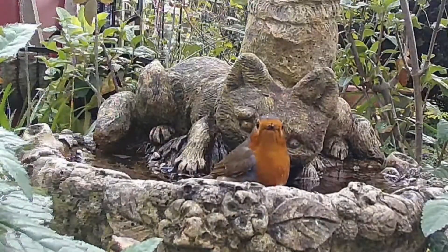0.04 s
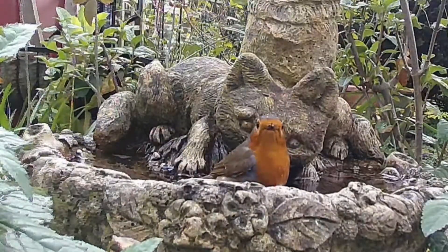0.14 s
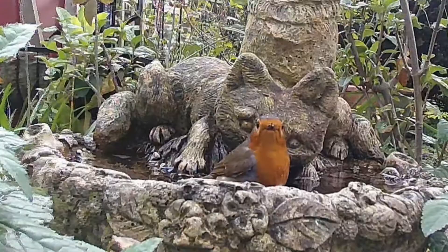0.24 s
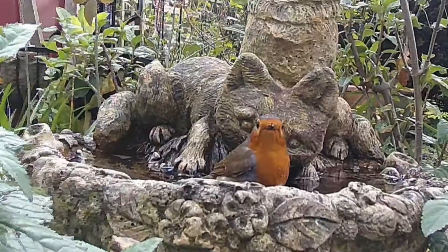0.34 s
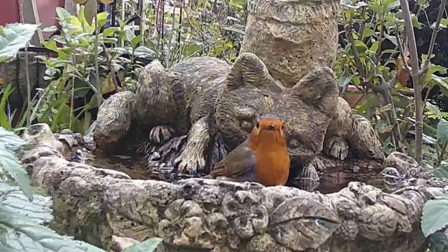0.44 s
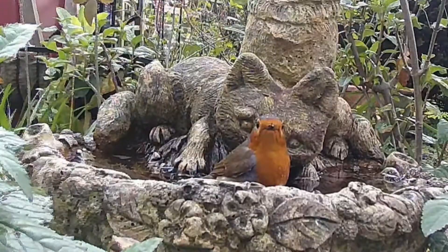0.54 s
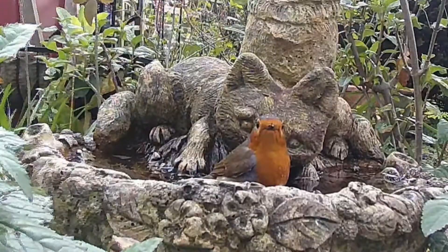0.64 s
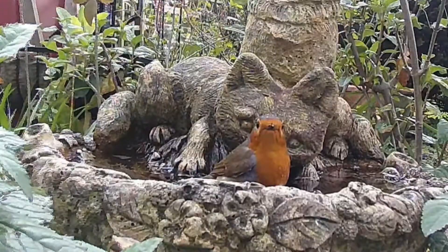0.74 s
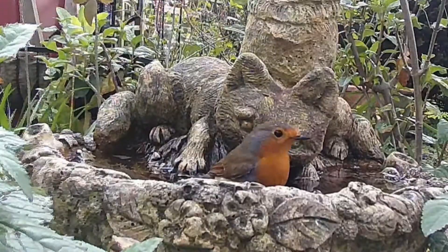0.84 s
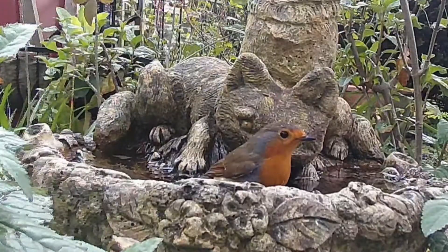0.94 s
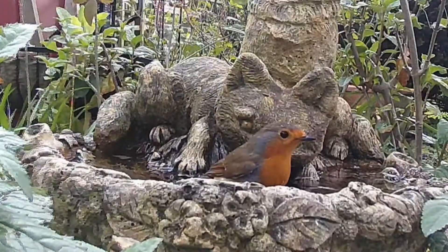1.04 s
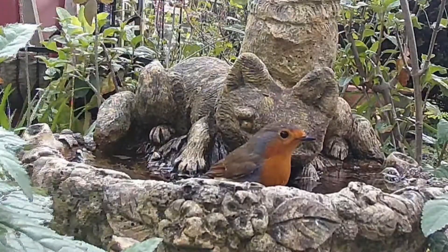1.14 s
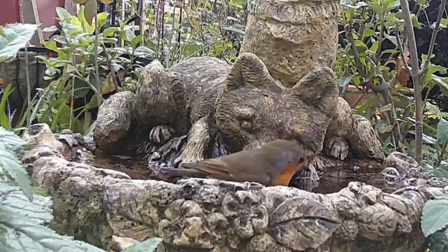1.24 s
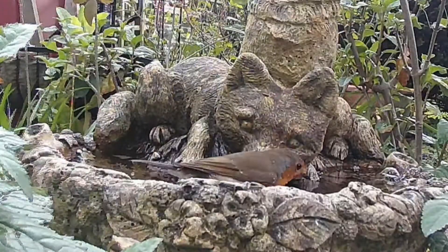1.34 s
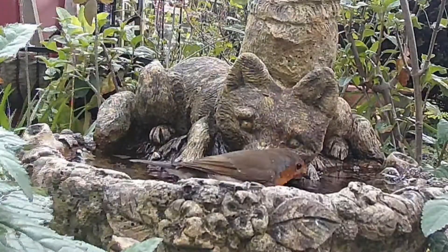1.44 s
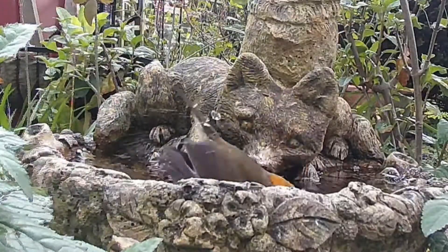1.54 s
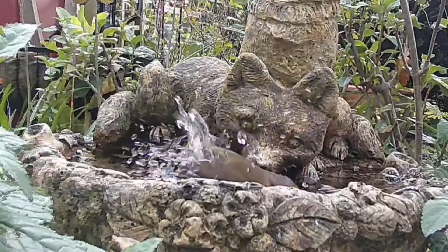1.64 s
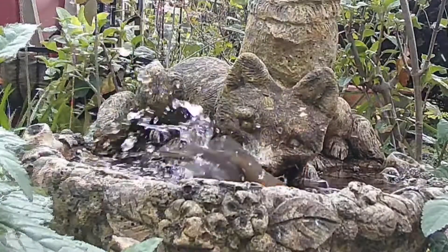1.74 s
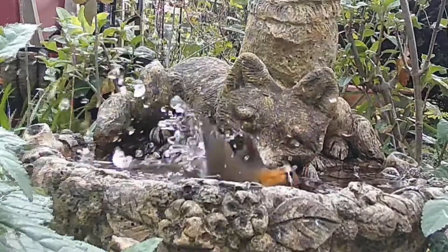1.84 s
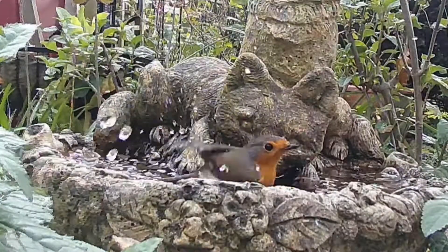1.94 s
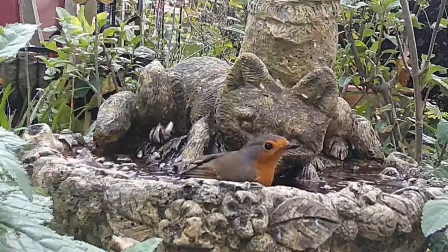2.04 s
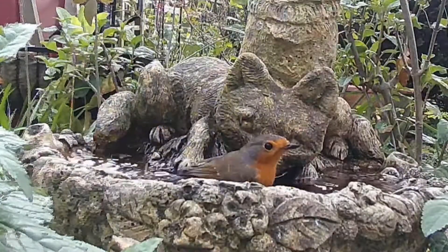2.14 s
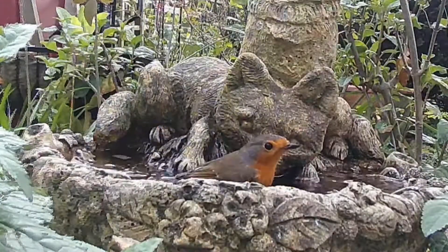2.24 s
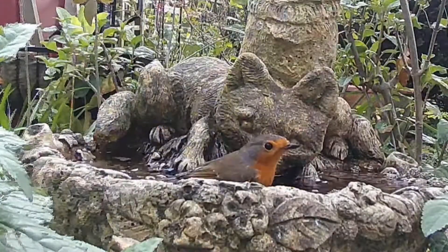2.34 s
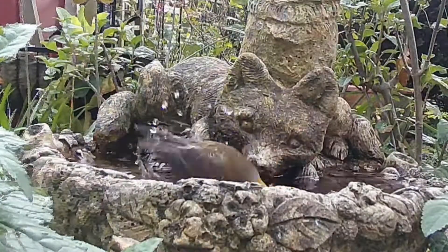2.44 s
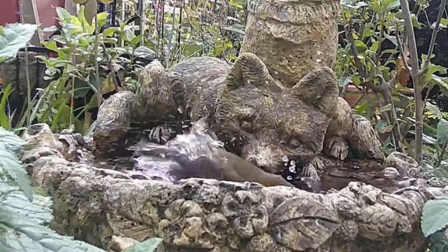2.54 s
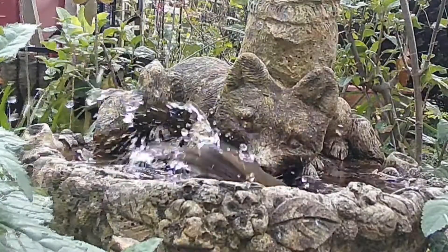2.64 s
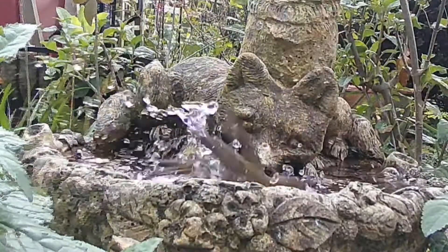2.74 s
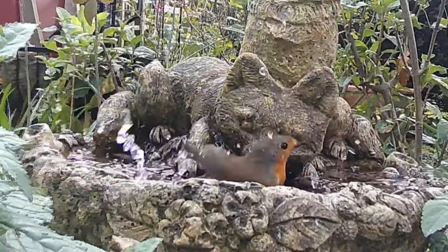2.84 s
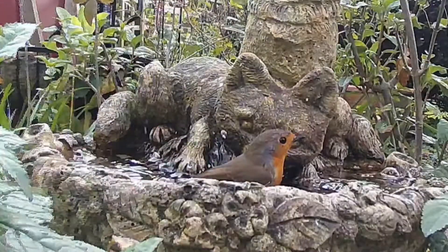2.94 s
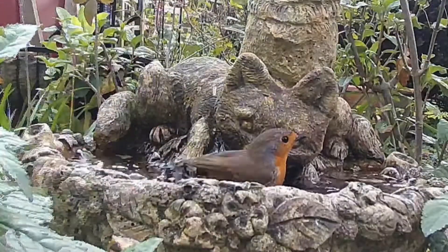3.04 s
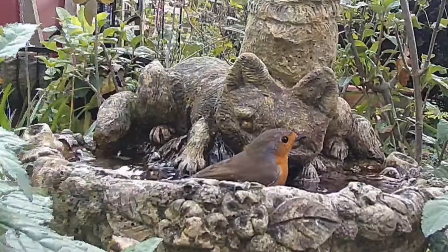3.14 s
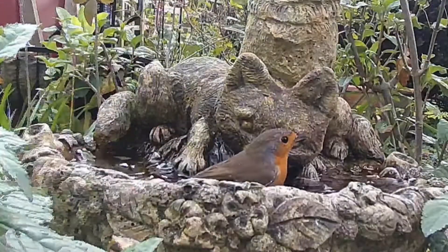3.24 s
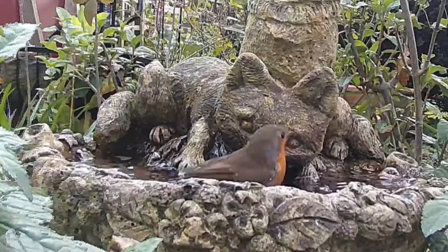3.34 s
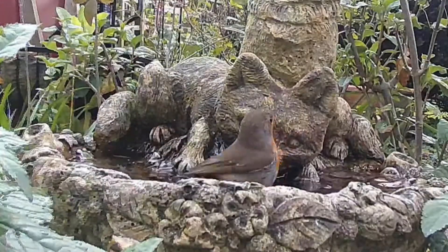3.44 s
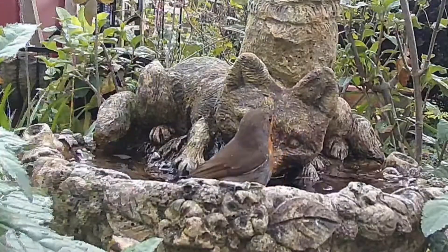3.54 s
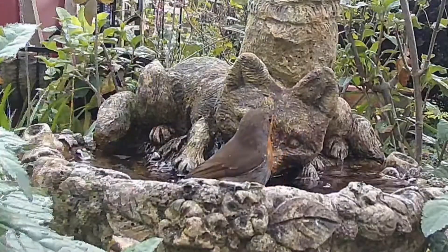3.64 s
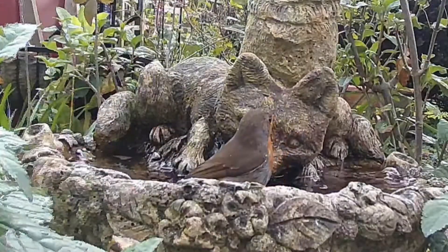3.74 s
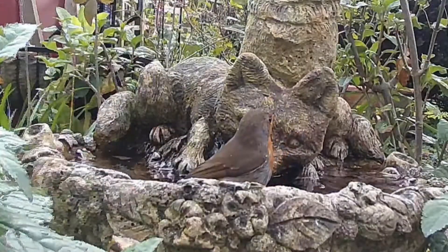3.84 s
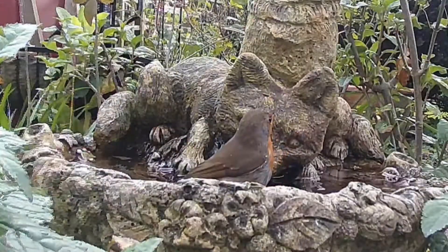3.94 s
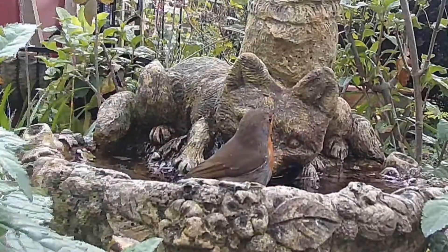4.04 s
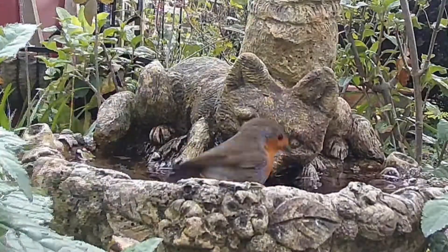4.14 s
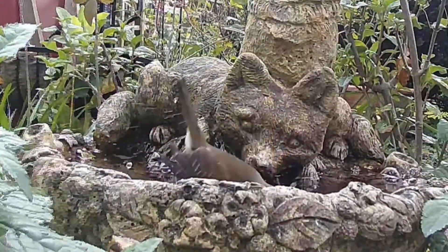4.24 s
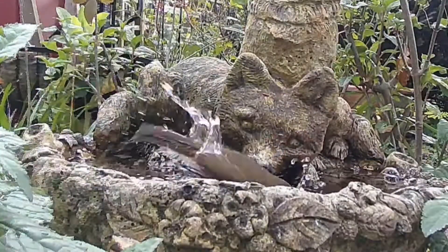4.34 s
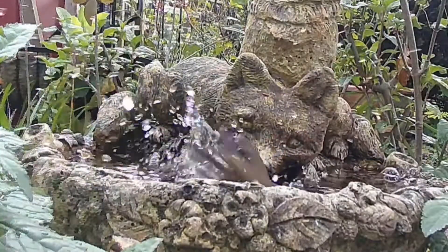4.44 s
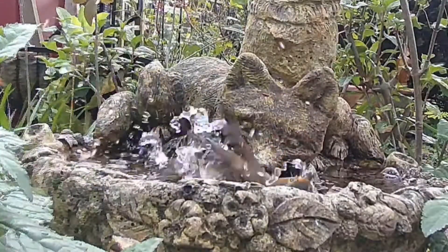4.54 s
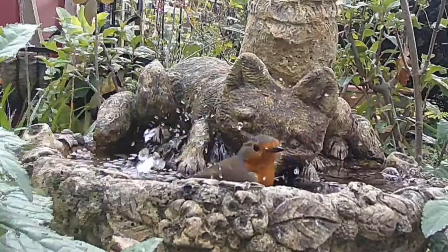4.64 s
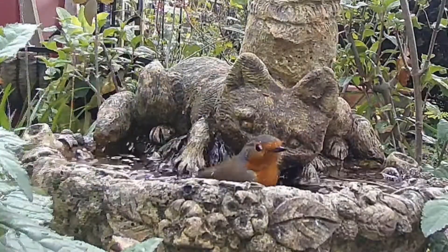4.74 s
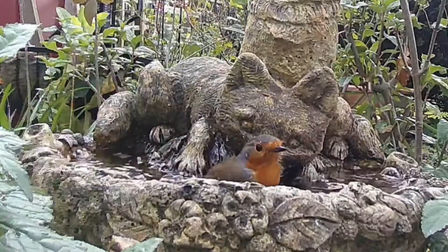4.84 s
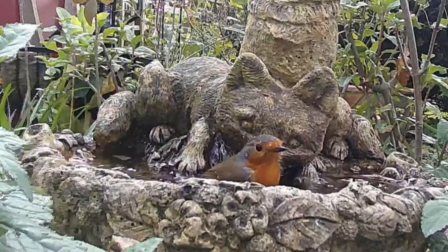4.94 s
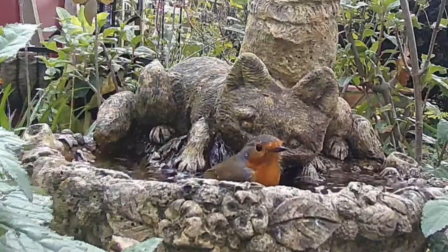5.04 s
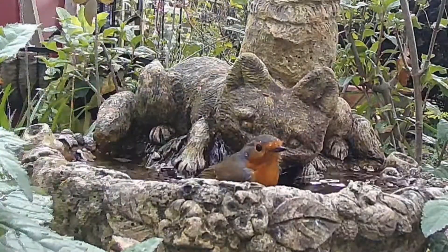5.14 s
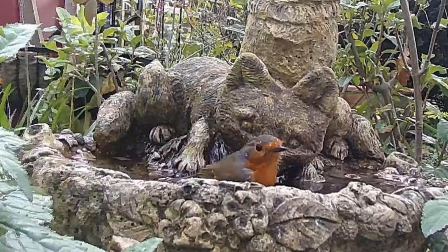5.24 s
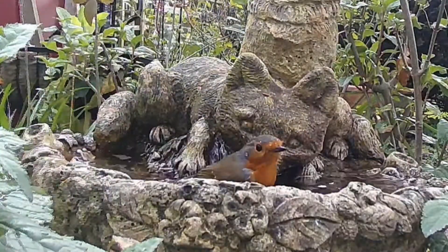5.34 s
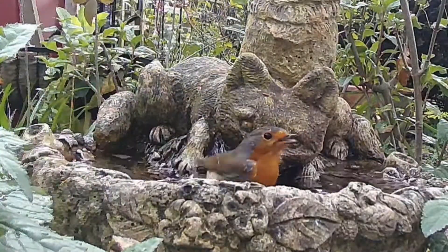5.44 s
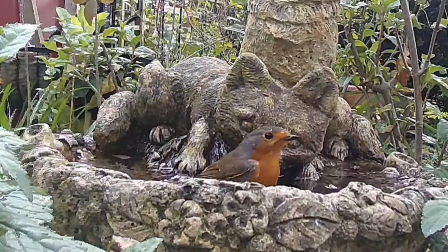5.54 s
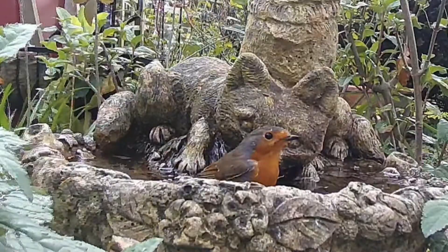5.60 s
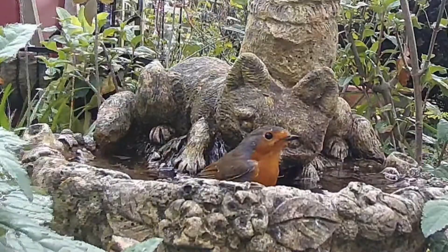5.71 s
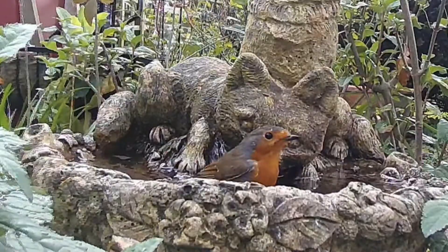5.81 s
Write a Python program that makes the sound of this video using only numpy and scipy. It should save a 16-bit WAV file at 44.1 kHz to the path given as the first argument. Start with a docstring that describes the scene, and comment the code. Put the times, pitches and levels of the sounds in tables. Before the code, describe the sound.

A garden is heard through a slightly muffled microphone, with a steady low rumble of distant road and breeze and a soft hiss. Faint birds chirp and whistle on and off throughout. One dry click sounds at about 0.3 seconds. A far engine hums, rising slowly in pitch, then easing off between 2.5 and 3 seconds. Close up, a small bird bathes in a basin: quick wing slaps on water, fine spray and small plinking drops, from 1.6 to 2 seconds and again from 2.5 to 3. In the pause, a faint traffic drone climbs and a few sharper chirps come at around 3.5 seconds. A third bout of splashing runs from 4.3 to 4.9 seconds. Low gusts of wind buffet the microphone from about 4.2 seconds to the end, near 6 seconds, with thin distant birdsong behind them.

```python
"""Robin in a garden bird bath

Close to the microphone a robin bathes in a stone basin: three bouts of wing slaps, spray and drops
that plink as trapped bubbles ring. Other birds chirp across the garden, a far engine pulls away,
and wind buffets the microphone towards the end. The camera's housing rings near 3 kHz and muffles
everything above; one dry click sounds early on."""
import sys
import numpy as np
from scipy import signal
from scipy.fft import rfft, irfft, next_fast_len
from scipy.io import wavfile
from scipy.ndimage import uniform_filter1d, map_coordinates

SR = 44100
rng = np.random.default_rng(int(sys.argv[2]) if len(sys.argv) > 2 else 0)


def store_wav(level_fs):
    """Save 16-bit WAV to argv[1]."""
    pcm = np.round(np.clip(np.atleast_2d(level_fs), -1, 1) * 32767)
    wavfile.write(sys.argv[1], SR, pcm.T.astype(np.int16))


N = 258867

# Close up, wings and thrown water hit the surface: start_s, relative_db, treble_lift_db
WING_SLAPS = [(1.671, -38.5, -1), (1.678, -32, -3), (1.6884, -35, -2), (1.7562, -38.5, -4),
              (1.77, -35.5, -6), (1.8506, -32, -7), (1.9177, -38, 2), (2.5096, -38, -6), (2.586, -39, -4),
              (2.5997, -38, -2), (2.6816, -31, 0), (2.723, -41, 11), (2.8114, -38, 5), (2.932, -43, 6),
              (2.966, -41.5, 6), (4.367, -37, -1), (4.4654, -40, -5), (4.5504, -38, -3), (4.602, -33.5, -3),
              (4.6056, -35, -2), (4.6328, -36.5, 5), (4.693, -38.5, -2), (4.7385, -37, -4),
              (4.776, -39.5, 5), (4.8434, -41, -1)]
# Bubbles trapped by single drops: start_s, relative_db, pitch_hz, decay_s
DROP_BUBBLES = [(1.678, -41, 2560, 0.005), (1.796, -49, 3050, .005), (1.854, -41, 3040, .004),
                (1.855, -44, 2500, 0.0037), (1.921, -51, 2270, 0.019), (1.977, -43.5, 2030, 0.0078),
                (2.589, -43.5, 2590, .005), (2.613, -45.5, 1590, .005), (2.699, -37.5, 3000, 0.0045),
                (2.7355, -38, 2370, 0.0062), (2.847, -44, 2740, 0.0033), (2.871, -41.5, 3064, 0.0037),
                (4.328, -39, 2780, 0.0033), (4.405, -38.5, 2405, 0.0087), (4.408, -44.5, 2940, 0.0049),
                (4.469, -42.5, 1810, 0.0044), (4.5108, -39, 2150, 0.0038), (4.514, -39.5, 2400, 0.0083),
                (4.5514, -38, 1690, .004), (4.633, -43, 3330, 0.0044), (4.656, -47.5, 4150, .007),
                (4.737, -44.5, 3020, 0.003), (4.739, -44, 1200, 0.013), (4.775, -47, 4000, .003)]
# Bouts of wing shaking: start_s, fullest_s, end_s, spray_db
BATHING_BOUTS = [(1.586, 1.83, 2.023, -59.5), (2.51, 2.587, 2.97, -61.5), (4.31, 4.624, 4.88, -58.5)]
# Spectrum of splashing water: frequency_hz, gain_db
SPLASH_SPECTRUM = [(300, -20.5), (800, -13), (1500, 1.5), (2600, 9), (3400, 4), (5000, -7), (8000, -16.5),
                   (15000, -20)]

# A bird in the hedge repeats one quick rising chip: start_s, level_db
HEDGE_CHIPS = [(.871, -57.5), (3.376, -56), (3.431, -54.5), (3.593, -59.5), (5.116, -61)]
# Raspy falling notes across the garden: start_s, length_s, start_hz, level_db
RASPY_NOTES = [(0.112, .05, 3520, -67), (1.08, .05, 3600, -70), (1.196, 0.073, 3600, -64),
               (3.505, .038, 3550, -59), (3.606, 0.0277, 3000, -56.5), (5.285, 0.033, 4210, -62.5)]
# Thin drawn-out whistles: start_s, length_s, start_hz, end_hz, level_db
THIN_WHISTLES = [(.272, .065, 5100, 5450, -64), (.332, 0.056, 5680, 5720, -62),
                 (0.453, 0.1, 3300, 3330, -68), (0.671, .045, 3330, 3500, -63.5),
                 (1.22, 0.18, 3540, 3603, -67), (1.38, .16, 3620, 3706, -71), (1.347, .05, 2560, 2414, -64),
                 (5.127, 0.12, 5860, 5670, -61), (5.494, 0.059, 3620, 4100, -63),
                 (5.679, .14, 3140, 3243, -69)]
# Faint phrases from the farthest birds: start_s, end_s, pitch_hz, level_db
FAR_PHRASES = [(0, .85, 3406, -71), (1.049, 1.25, 3500, -75), (3.201, 3.85, 4340, -71.5),
               (3.998, 4.35, 3430, -74), (5.298, 5.875, 4510, -70.5)]

# Gusts on the microphone: peak_s, half_width_s, relative_db
MIC_GUSTS = [(3.4, 0.33, -47.5), (4.22, 0.17, -36.5), (4.499, 0.047, -32.5), (4.63, 0.096, -32),
             (4.869, 0.084, -34.5), (5.149, 0.14, -33), (5.391, .12, -36.5), (5.74, 0.13, -39)]
# Spectrum of turbulence at the microphone: frequency_hz, gain_db
BUFFET_SPECTRUM = [(5, -11), (14, -2.5), (25, 0.5), (42, -5.5), (60, -10.5), (90, -19), (140, -29.5),
                   (250, -42), (600, -68.5), (2000, -120)]
# A gust's colour against the breeze: frequency_hz, gain_db
GUST_COLOUR = [(35, 0.5), (70, -4), (120, -4), (220, -0.5)]

# A far engine speeds up, then eases off: time_s, firing_hz, load_db
ENGINE_RUN = [(0, 55.1, 0), (.35, 59.96, -1), (1.0, 64.22, -1), (1.4, 67.94, -3), (1.8, 70.43, -4.5),
              (2.15, 75.04, -2.5), (2.55, 75.6, -3), (2.72, 65.2, -1.5), (3.05, 53.2, -5.5)]
# Its orders: firing_multiple, relative_db
ENGINE_ORDERS = [(.5, -57), (1, -44.5), (2, -64)]
# Exhaust resonances that boom as an order pulls through: centre_hz, half_width_hz, lift_db
EXHAUST_BOOMS = [(34.4, 4, 11.5), (128.3, 7.9, 15), (151.76, 1.8, 8)]
# A higher drone climbs in the traffic: time_s, pitch_hz, level_db
TRAFFIC_DRONE = [(2.5, 196, -66.5), (2.92, 213, -60.5), (3.08, 238, -60.5), (3.35, 252.5, -60.5),
                 (3.5, 261, -70), (3.9, 275, -65.5)]
# Spectrum of distant road rumble: frequency_hz, gain_db
ROAD_SPECTRUM = [(20, -5.5), (55, 7.5), (85, 6), (130, 4), (180, 0), (240, -2.5), (330, -12), (600, -33.5),
                 (3000, -82)]
# Spectrum of far tyres and leaves: frequency_hz, gain_db
HISS_SPECTRUM = [(100, -4.5), (350, -2), (550, -1), (780, 0.5), (1100, -2), (1500, -7), (2100, -8.5),
                 (3200, -10), (5000, -14.5), (8000, -11), (15000, -14)]
# The slow drift of their hiss: time_s, relative_db
HISS_LEVELS = [(0.0, -63.5), (2.43, -65), (2.65, -63.5), (3.76, -66), (4.48, -64), (5.87, -64.5)]
# Response of the housing around the microphone: frequency_hz, gain_db
HOUSING_RESPONSE = [(1500, 1), (2100, -1.5), (2600, -2), (3050, 1.5), (3330, 2.5), (3600, -5),
                    (4000, -13.5), (4700, -21), (5800, -19), (7100, -15), (7800, -18), (8700, -35.5),
                    (15000, -41)]


def wing_slaps(gain_db=7.5, snap_db=-4, crack_t60_s=0.018, wash_db=-23, wash_t60_s=0.23):
    """Each slap on the water is a snap, a short crack and a weaker wash of torn water."""
    out, t = np.zeros(N), np.arange(SR // 20) / SR
    for start_s, db, treble_db in WING_SLAPS:
        crack = amp(-60 * t / crack_t60_s)
        wash = amp(wash_db - 60 * t / wash_t60_s)
        burst = rng.standard_normal(len(t)) * (crack + wash)
        burst[0] += amp(snap_db) * np.linalg.norm(burst)
        splash = colour(burst, SPLASH_SPECTRUM)
        splash = colour(splash / np.linalg.norm(splash), [(3000, 0), (4500, treble_db)])
        add(out, start_s, amp(db + gain_db) * splash)
    return out


def drops(gain_db=1, rise_per_s=16):
    """Single drops plink in the basin; each trapped bubble rises in pitch as it surfaces."""
    out = np.zeros(N)
    for start_s, db, hz, decay_s in DROP_BUBBLES:
        add(out, start_s, amp(db + gain_db) * bubble(hz, hz * (1 + rise_per_s * decay_s), decay_s))
    return out


def spray(droplets_per_s=520, centre_hz=2600, spread=0.36, decay_cycles=4, patter_db=-2, mist_db=-9):
    """Shaken feathers throw a patter of tiny droplets over a fine mist."""
    flow = sum(bout(*row) for row in BATHING_BOUTS)
    patter = np.zeros(N)
    for when, smallness, pitch in rng.random((int(droplets_per_s * N / SR), 3)):
        hz = centre_hz * np.exp(2 * spread * (2 * pitch - 1))
        strength = amp(-5 * np.log(smallness + 0.083))  # many small droplets, few large ones
        add(patter, when * N / SR, strength * bubble(hz, hz * 1.12, decay_cycles / hz))
    return flow * (amp(patter_db) * unit(patter) + amp(mist_db) * noise(SPLASH_SPECTRUM))


def bout(start_s, fullest_s, end_s, db, edge_db=-5.5):
    """The flow of spray swells to its fullest and ebbs."""
    shape = [(start_s, edge_db), (fullest_s, 0), (end_s, edge_db)]
    return amp(db + curves(shape)[0]) * during(shape, fade_s=0.04)


def bubble(start_hz, end_hz, decay_s, onset_s=0.0001, fall_db=19):
    """A surfacing bubble rings, sliding to end_hz and dying by fall_db within decay_s."""
    t = np.arange(int(2 * decay_s * SR) + 2) / SR
    age = t / decay_s
    envelope = (1 - np.exp(-t / onset_s)) * amp(-fall_db * age)
    return envelope * sine(start_hz + (end_hz - start_hz) * age)


def songbirds(chip_hz=2910, chip_rise=1.36, chip_s=0.024, rasp_fall=0.85, echo_db=-34):
    """Chips, rasps and whistles across the garden; the fainter a bird, the more of it is echo."""
    notes = [(s, db, whistle(chip_hz, chip_hz * chip_rise, chip_s, waver=0.025))
             for s, db in HEDGE_CHIPS]
    notes += [(s, db, whistle(hz, hz * rasp_fall, length_s, waver=0.045))
              for s, length_s, hz, db in RASPY_NOTES]
    notes += [(s, db, whistle(start_hz, end_hz, length_s, waver=0.008))
              for s, length_s, start_hz, end_hz, db in THIN_WHISTLES]
    direct, scattered = np.zeros(N), np.zeros(N)
    for start_s, db, note in notes:
        add(direct, start_s, amp(db) * note)
        add(scattered, start_s, amp(echo_db + db / 2) * note)
    return direct + garden_echo(scattered, t60_s=0.31)


def far_songs(notes_per_s=26, spread=0.12, glide=0.06, note_s=0.049):
    """The farthest birds sing quick runs of notes scattered around one pitch."""
    out = np.zeros(N)
    for start_s, end_s, pitch_hz, db in FAR_PHRASES:
        beats = np.arange(start_s, end_s, 1 / notes_per_s)
        for beat_s, (late, step, slide) in zip(beats, rng.uniform(-1, 1, (60, 3))):
            hz = pitch_hz * np.exp(spread * step)
            note = whistle(hz, hz * np.exp(glide * slide), note_s, waver=0.03)
            add(out, beat_s + 0.5 * late / notes_per_s, amp(db) * note)
    return out


def whistle(start_hz, end_hz, length_s, waver):
    """One bird note glides, slightly unsteady, as it swells and fades."""
    age = np.linspace(0, 1, int(length_s * SR))
    unsteady = map_coordinates(rng.standard_normal(200), [age * length_s * 400], mode="mirror")
    glide_hz = start_hz + (end_hz - start_hz) * age
    return np.sin(np.pi * age) * sine(glide_hz * (1 + waver * unsteady))


def wind(breeze_db=-46, gust_gain_db=1.5):
    """A steady breeze on the microphone, with gusts swelling over it in the second half."""
    t = np.arange(N) / SR
    gusts = sum(amp(db + gust_gain_db) * np.exp(-((t - peak_s) / half_width_s) ** 2)
                for peak_s, half_width_s, db in MIC_GUSTS)
    return amp(breeze_db) * eddies() + gusts * unit(colour(eddies(), GUST_COLOUR))


def eddies():
    """Turbulence at the microphone, fairly even in strength from moment to moment."""
    buffet = noise(BUFFET_SPECTRUM)
    local_power = np.abs(uniform_filter1d(buffet ** 2, SR // 8))
    return unit(buffet / np.sqrt(local_power + 0.15))


def far_engine(ease_off_s=2.55, rough_db=2):
    """Only the lowest orders carry into the garden, booming at resonances until the throttle closes."""
    firing_hz, load_db = curves(ENGINE_RUN)
    pulling = np.arange(N) / SR < ease_off_s
    unsteady = 1 + 0.004 * wobble(14)
    exhaust = np.zeros(N)
    for multiple, db in ENGINE_ORDERS:
        order_hz = multiple * firing_hz
        boom_db = sum(lift_db * np.exp(-((order_hz - centre_hz) / half_width_hz) ** 2)
                      for centre_hz, half_width_hz, lift_db in EXHAUST_BOOMS)
        boom_db = uniform_filter1d(boom_db * pulling, size=SR // 10)
        exhaust += amp(db + boom_db + rough_db * wobble(10)) * sine(order_hz * unsteady)
    return amp(load_db) * exhaust * during(ENGINE_RUN, fade_s=0.25)


def traffic_drone(rough_db=1.2, waver=0.007):
    """One unsteady tone climbs out of the far traffic."""
    hz, db = curves(TRAFFIC_DRONE)
    envelope = amp(db + rough_db * wobble(16)) * during(TRAFFIC_DRONE, fade_s=0.067)
    return envelope * sine(hz * (1 + waver * wobble(25)))


def distant_ambience(rumble_db=-56, hiss_gain_db=4):
    """Road rumble and the hiss of far tyres and leaves."""
    hiss_db = curves(HISS_LEVELS)[0] + hiss_gain_db
    return amp(rumble_db) * noise(ROAD_SPECTRUM) + amp(hiss_db) * noise(HISS_SPECTRUM)


def garden_echo(sound, t60_s, onset_s=0.0033):
    """Fences and foliage scatter a short diffuse echo back to the microphone."""
    t = np.arange(SR // 2) / SR
    tail = rng.standard_normal(len(t)) * amp(-60 * t / t60_s) * (1 - np.exp(-t / onset_s))
    return signal.fftconvolve(sound, tail / np.linalg.norm(tail))[:N]


def click(start_s=0.3283, level_db=-35, t60_s=0.013):
    """One dry click: a sudden step that relaxes."""
    out, t = np.zeros(N), np.arange(SR // 10) / SR
    add(out, start_s, -amp(level_db - 60 * t / t60_s))
    return out


def amp(db):
    """Decibels to gain."""
    return 10 ** (np.asarray(db) / 20)


def unit(x):
    """Scale to rms 1."""
    return x / np.sqrt(np.mean(x ** 2) + 1e-20)


def curves(rows):
    """One value per sample for each column after the time."""
    times, *columns = np.transpose(rows)
    return [np.interp(np.arange(N) / SR, times, column) for column in columns]


def during(rows, fade_s):
    """1 over the span of a table, fading to 0 outside it."""
    t = np.arange(N) / SR
    return np.clip(1 + np.minimum(t - rows[0][0], rows[-1][0] - t) / fade_s, 0, 1)


def wobble(knots_per_s):
    """A smooth random curve."""
    knots = rng.standard_normal(int(N * knots_per_s / SR) + 4)
    return map_coordinates(knots, [np.arange(N) * knots_per_s / SR])


def colour(x, points):
    """Causal filter through (frequency_hz, gain_db) points."""
    size = 2 * next_fast_len(len(x) // 2 + SR // 10)
    hz, db = np.transpose(points)
    gain = amp(np.interp(np.log(np.fft.rfftfreq(size, 1 / SR) + 1), np.log(hz), db))
    cepstrum = irfft(np.log(gain))
    cepstrum[1:size // 2] *= 2  # fold onto positive time for minimum phase
    cepstrum[size // 2 + 1:] = 0
    return irfft(rfft(x, size) * np.exp(rfft(cepstrum)))[:len(x)]


def noise(points):
    """Coloured noise of rms 1."""
    return unit(colour(rng.standard_normal(N), points))


def add(track, start_s, sound):
    """Mix a sound into the track."""
    part = track[max(round(start_s * SR), 0):][:len(sound)]
    part += sound[:len(part)]


def sine(hz):
    """A tone that follows a pitch curve."""
    return np.sin(2 * np.pi * np.cumsum(hz) / SR)


def scene(bath_echo_db=-17, far_echo_db=2):
    """At the microphone the near bath is almost dry; the farthest songs are mostly echo."""
    bath = drops() + wing_slaps() + spray()
    songs = far_songs()
    echoes = amp(bath_echo_db) * garden_echo(bath, t60_s=0.055)
    echoes += amp(far_echo_db) * garden_echo(songs, t60_s=0.15)
    birds = songs + songbirds()
    background = far_engine() + traffic_drone() + wind() + distant_ambience()
    return (bath + birds + echoes + background)[None]


def record(dry, hiss_db=-92, top_hz=15500):
    """One microphone, coloured by its housing, with a click, faint electronic hiss and a band limit."""
    sound = colour(dry[0], HOUSING_RESPONSE) + amp(hiss_db) * rng.standard_normal(N) + click()
    size = next_fast_len(N + SR // 2)
    passband = np.fft.rfftfreq(size, 1 / SR) < top_hz
    return irfft(rfft(sound, size) * passband, size)[None, :N]


dry = scene()
out = record(dry)
store_wav(out)
```